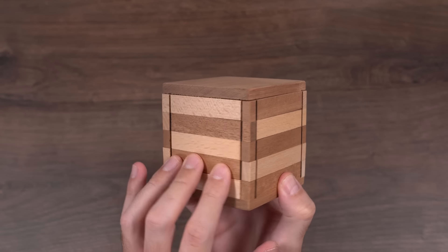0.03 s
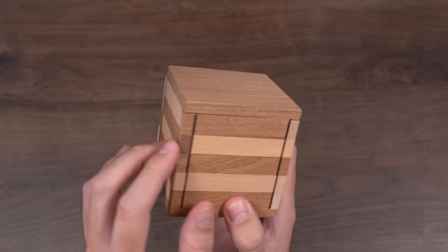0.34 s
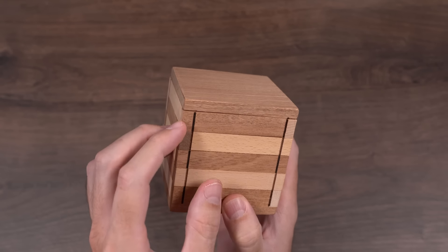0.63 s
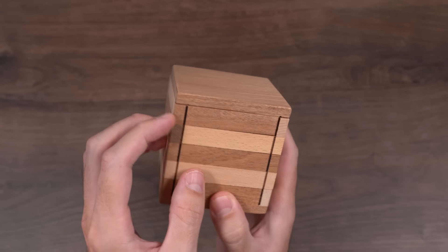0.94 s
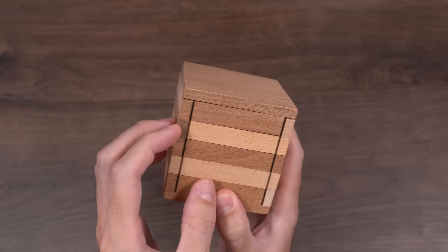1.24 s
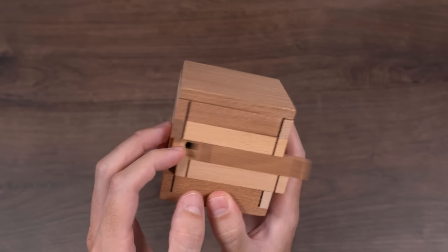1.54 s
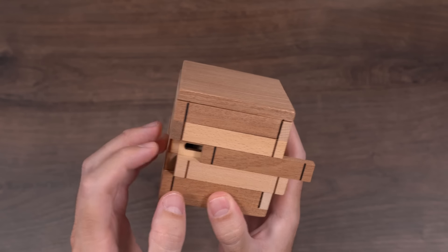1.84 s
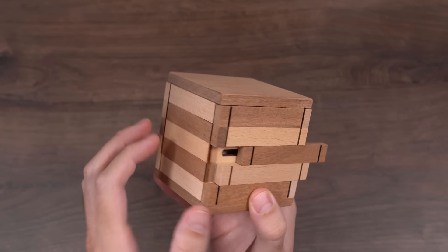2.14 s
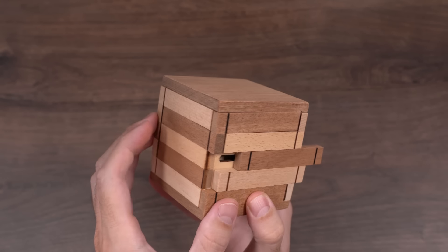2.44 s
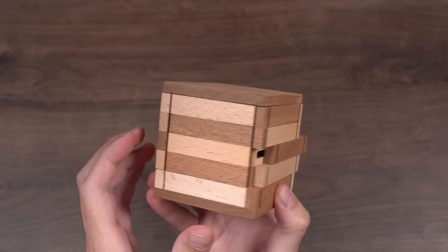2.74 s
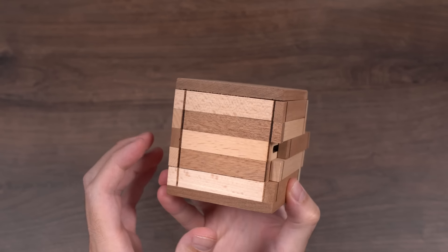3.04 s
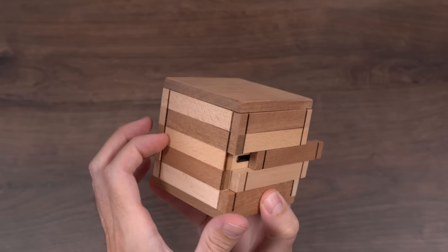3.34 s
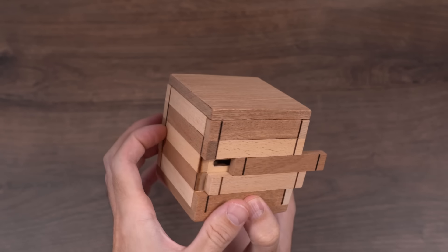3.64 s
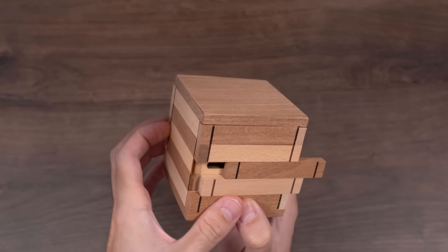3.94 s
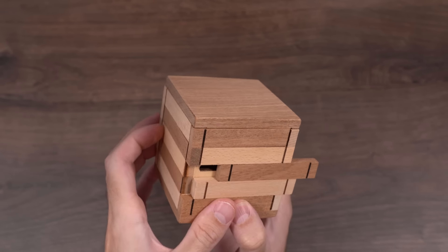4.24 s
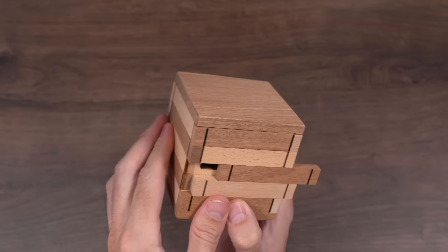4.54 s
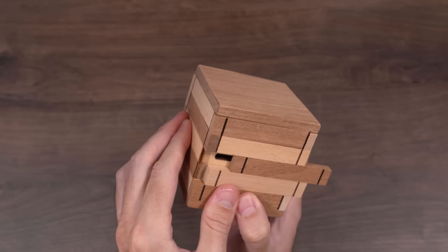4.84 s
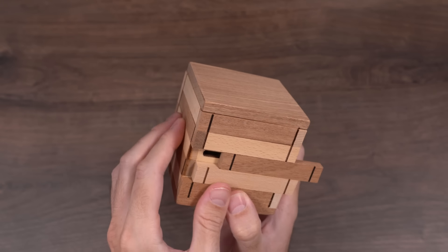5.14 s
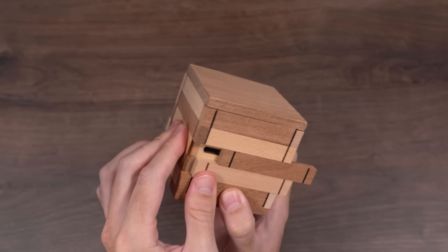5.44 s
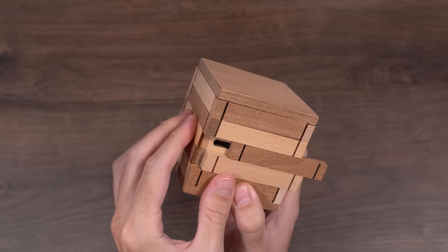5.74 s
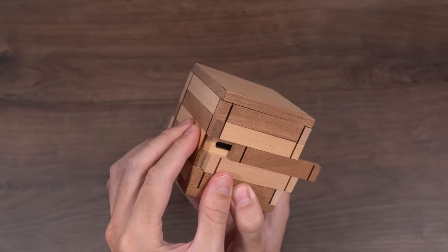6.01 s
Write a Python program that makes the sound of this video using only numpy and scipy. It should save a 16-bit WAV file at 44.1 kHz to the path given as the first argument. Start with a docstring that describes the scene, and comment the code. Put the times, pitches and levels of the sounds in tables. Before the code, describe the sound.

A wooden slat scrapes briefly and snaps against its stop, followed by a light tick and soft finger handling in a quiet room.

```python
"""Wooden puzzle box, close up.

Two hands turn the box over a low ventilation hum; fingertips hiss on the grain in runs of micro-slips.
One slat gives way, scrapes along its groove, cracks against the stop and rebounds, ringing the box.
Finger pads and palms give low thuds. Later a loose piece ticks, nails and joints snap faintly,
and a slat creeps with a faint, narrow hiss. The quiet room adds a short diffuse tail."""
import sys
import numpy as np
from scipy import signal
from scipy.fft import rfft, irfft
from scipy.io import wavfile

SR = 44100
rng = np.random.default_rng(int(sys.argv[2]) if len(sys.argv) > 2 else 0)


def dump(signal):
    """Clip the signal to [-1, 1] and save it as 16-bit WAV at the path in sys.argv[1]."""
    limited = np.clip(np.atleast_2d(signal).T, -1, 1)
    pcm = np.round(limited * 32767).astype(np.int16)
    wavfile.write(sys.argv[1], SR, pcm)


N = 272185
BLOW_SAMPLES = SR // 8
BLOW_TIME_S = np.arange(BLOW_SAMPLES) / SR


def from_db(db):
    return 10 ** (np.asarray(db) / 20)


def unit_rms(x):
    return x / np.sqrt(np.mean(x ** 2) + 1e-20)


def unit_attack(x):
    """Scale to rms 1 over the first 5 ms."""
    return x / np.sqrt(np.mean(x[:SR // 200] ** 2) + 1e-20)


def at_hz(curve, hz):
    points_hz, values = np.transpose(curve)
    return np.interp(np.log(hz + 1e-9), np.log(points_hz), values)


def bell_db(hz, centre_hz, width_oct):
    return -10 / np.log(10) * (np.log2(hz / centre_hz) / width_oct) ** 2


def coloured(x, gain_db_at):
    hz = np.fft.rfftfreq(len(x), 1 / SR) + 1
    return irfft(rfft(x) * from_db(gain_db_at(hz)), len(x))


def lowpass(x, hz, order=2):
    return signal.sosfilt(signal.butter(order, min(hz, .45 * SR), fs=SR, output="sos"), x)


def highpass(x, hz, order=2):
    return signal.sosfilt(signal.butter(order, hz, "high", fs=SR, output="sos"), x)


def add(track, start_s, sound):
    at = max(round(start_s * SR), 0)
    track[at:at + len(sound)] += sound[:max(N - at, 0)]


def stray_touches(per_s, level_db, centre_hz, spread_db=7.5, spread_oct=.3):
    """Touches at random moments, as rows of start_s, level_db, centre_hz."""
    draws = rng.random((40, 3))
    starts_s = np.cumsum(-np.log(1 - draws[:, 0])) / per_s
    levels_db = level_db + spread_db * (2 * draws[:, 1] - 1)
    centres_hz = centre_hz * 2 ** (spread_oct * (2 * draws[:, 2] - 1))
    return [row for row in zip(starts_s, levels_db, centres_hz) if row[0] < N / SR]


# Room air: freq_hz, density_db
AIR_SPECTRUM = [(12, -29.5), (20, -2), (39, -3.5), (77, -15), (163, -2), (204, -8.5), (310, -6), (399, -15),
                (446, -10), (897, -18), (1220, -17.5), (1530, -20.5), (4540, -36.5), (14700, -43.5),
                (16000, -49.5)]
# Ventilation hum: centre_hz, half_width_hz, level_db
HUM_LINES = [(108.4, 13, -66.5), (160.8, 10.9, -61.5), (238.7, 25, -68.5)]


def air_and_hum(air_db=-60, rumble_db=-61.5, rumble_hz=30, rumble_width_oct=.6):
    """Room air, a deep rumble and ventilation hum, whose narrow noise bands waver."""
    def noise(gain_db_at):
        return unit_rms(coloured(rng.standard_normal(N), gain_db_at))

    out = from_db(air_db) * noise(lambda hz: at_hz(AIR_SPECTRUM, hz))
    out += from_db(rumble_db) * noise(lambda hz: bell_db(hz, rumble_hz, rumble_width_oct))
    for centre_hz, half_width_hz, level_db in HUM_LINES:
        line = noise(lambda hz: -20 * np.log10(1 + ((hz - centre_hz) / half_width_hz) ** 2))
        out += from_db(level_db) * line
    return out


def rub_pressure(t, length_s, landing_share=.14, ease_db=2, lift_s=0.017):
    """Force rises on contact, eases along the rub and ends on release."""
    landing = t / (landing_share * length_s)
    lifting = (length_s - t) / lift_s
    contact = np.clip(np.minimum(landing, lifting), 0, 1)
    return contact * from_db(-ease_db * t / length_s)


# Skin sliding on wood: freq_hz, density_db
SKIN_SPECTRUM = [(700, -8), (1300, 2), (2000, -5), (2500, 1.5), (2900, -4), (3400, 1), (4000, -5),
                 (4600, -2), (5400, -7.5), (7500, -2), (9200, -3), (10300, -14), (12500, -8.5),
                 (16000, -11)]
# Fingertip rubs and one faint, narrow hiss of a slat creeping in its groove (at 4.78 s):
# start_s, length_s, level_db, centre_hz, width_oct
RUBS_AND_CREEP = [(0.0, 0.097, -71.5, 6000, 0.75), (0.136, 0.18, -64.5, 8000, 1.2),
                  (0.308, 0.15, -72.5, 3000, 0.81), (.39, 0.043, -68, 3000, 2),
                  (0.423, 0.29, -69.5, 4080, 1.35), (1.003, .028, -68, 4500, 1.1),
                  (1.385, 0.022, -64, 3560, 0.88), (1.426, 0.041, -59.5, 9000, 2.3),
                  (1.882, 0.074, -68.5, 7260, 1.2), (2.156, .045, -74, 7000, 1.2),
                  (2.564, 0.049, -72, 5000, 2.5), (3.232, 0.057, -69, 6440, 0.27),
                  (3.257, 0.056, -63.5, 7000, 2.2), (3.386, 0.063, -64.5, 11000, 2),
                  (3.553, 0.036, -64, 5000, 3.4), (3.806, 0.021, -68, 4000, 1.8),
                  (4.445, 0.057, -66.5, 3000, 1.5), (4.575, 0.054, -63, 3050, 0.84),
                  (4.67, 0.036, -51, 5200, 1.7), (4.78, .22, -72.5, 3430, 0.37),
                  (5.018, 0.027, -67.5, 6620, 2.4), (5.425, 0.076, -54, 5910, 2.2),
                  (5.898, 0.073, -61, 5240, 2.4), (6.121, 0.07, -67.5, 1450, 2)]


def rubs_and_creep(grain_db=2.0, uneven_db=1.5, ripple_db=1.5, brush_s=.04, brush_width_oct=2.1):
    """Skin ridges, and once a slat, catch on the grain; grip shifts add light random brushes."""
    out = np.zeros(N)
    grip = unit_rms(lowpass(rng.standard_normal(N), hz=60))
    catches = np.repeat(rng.standard_normal(N), 16)[:N]
    slips = rng.standard_normal(N) * from_db(grain_db * catches + uneven_db * grip)
    brushes = [(start_s, brush_s, level_db, hz, brush_width_oct)
               for start_s, level_db, hz in stray_touches(per_s=1.0, level_db=-80, centre_hz=5500)]
    rubs = RUBS_AND_CREEP + brushes
    # Each spot on the box favours other resonances.
    modes_hz = np.geomspace(1500, 16000, 40)
    spots_db = ripple_db * rng.standard_normal((64, len(modes_hz)))
    for (start_s, length_s, level_db, centre_hz, width_oct), spot_db in zip(rubs, spots_db):
        samples = np.arange(round(length_s * SR))
        grains = np.take(slips, round(start_s * SR) + samples, mode="wrap")
        hiss = coloured(grains, lambda hz: at_hz(SKIN_SPECTRUM, hz)
                        + bell_db(hz, centre_hz, width_oct)
                        + np.interp(hz, modes_hz, spot_db))
        add(out, start_s, from_db(level_db) * rub_pressure(samples / SR, length_s) * unit_rms(hiss))
    return out


# Dense short-lived slat modes, in scrape and crack: freq_hz, density_db
SLAT_SPECTRUM = [(150, -22), (400, -7), (850, -6), (1250, 2), (1600, -3), (2200, -3), (3200, -6),
                 (4500, -5), (6000, -11), (9000, -15), (11000, -19.5), (16000, -25.5)]


def slat_slide(start_s=1.567, end_s=1.606, start_db=-55, end_db=-39, slips_per_s=12000, tilt_db_oct=-4):
    """The freed slat scrapes along its groove, louder as it gathers speed."""
    out = np.zeros(N)
    slips = rng.standard_normal(BLOW_SAMPLES) * (rng.random(BLOW_SAMPLES) < slips_per_s / SR)
    scrape = coloured(slips, lambda hz: at_hz(SLAT_SPECTRUM, hz) + tilt_db_oct * np.log2(hz + 300))
    swell = from_db(np.linspace(start_db, end_db, round((end_s - start_s) * SR)))
    add(out, start_s, unit_rms(scrape)[:len(swell)] * swell)
    return out


def ringing(modes):
    """Struck modes, neighbours in opposite sign; the wider a resonance, the sooner it dies."""
    out = np.zeros(BLOW_SAMPLES)
    for k, (pitch_hz, width_hz, gain_db) in enumerate(modes):
        envelope = from_db(gain_db) * width_hz * np.exp(-np.pi * width_hz * BLOW_TIME_S)
        out += (-1) ** k * envelope * np.sin(2 * np.pi * pitch_hz * BLOW_TIME_S)
    return out


def blow_decay(t60_s):
    return from_db(-60 * BLOW_TIME_S / t60_s)


def contact_pulse(pitch_hz=2000, width_hz=1500, edge_hz=7000):
    """First push of air from the struck face, about one cycle; the wood gives, rounding the edge."""
    push = np.exp(-np.pi * width_hz * BLOW_TIME_S) * np.cos(2 * np.pi * pitch_hz * BLOW_TIME_S)
    return unit_attack(lowpass(highpass(push, pitch_hz / 2), edge_hz, order=1))


# Box resonances: pitch_hz, width_hz, gain_db
BOX_MODES = [(380, 110, -14.5), (600, 140, -16.5), (818, 220, -16), (1210, 160, 3), (1354, 160, 1),
             (1700, 200, -5), (1946, 200, -2), (2116, 210, -0.5), (2399, 170, -1.5), (2980, 110, -11),
             (3320, 200, -10), (3780, 105, -4), (4324, 210, -5), (4594, 120, -6), (5000, 300, -13.5),
             (5500, 420, -13.5), (6224, 270, -14.5), (7474, 400, -24), (8120, 230, -22), (9050, 400, -19),
             (12300, 160, -17)]
# Slat impacts: start_s, level_db, contact_lowpass_hz, pitch_ratio
SLAT_KNOCKS = [(1.576, -39, 2440, 0.95), (1.5988, -41, 8830, 1.2), (1.6055, -15.0, 11500, 1.0),
               (1.6299, -19, 4398, .99), (1.6317, -26, 10980, .96), (4.8747, -56.5, 4470, 0.976),
               (6.0928, -54, 1410, 0.95), (6.1053, -45, 1250, 1.02)]


def slat_knocks(polarity, pulse_db=-3.5, crack_db=-6, crack_t60_s=0.035, radiate_above_hz=380):
    """Each impact is a sharp pulse, box ring and slat crack; the small body radiates little bass."""
    out = np.zeros(N)
    pulse = polarity * from_db(pulse_db) * contact_pulse()
    for start_s, level_db, contact_hz, pitch_ratio in SLAT_KNOCKS:
        modes = [(hz * pitch_ratio, width_hz, gain_db) for hz, width_hz, gain_db in BOX_MODES]
        body = unit_attack(highpass(ringing(modes), radiate_above_hz))
        noise = coloured(rng.standard_normal(BLOW_SAMPLES), lambda hz: at_hz(SLAT_SPECTRUM, hz))
        crack = from_db(crack_db) * unit_attack(noise * blow_decay(crack_t60_s))
        blow = lowpass(pulse + body + crack, contact_hz, order=3)   # soft contact dulls it
        add(out, start_s, from_db(level_db) * unit_attack(blow))
    return out


# Low thuds of the whole box, from finger pads and palms and, at 1.609 s and 1.6314 s, from the rebounding slat:
# start_s, peak_db, pitch_hz
BOX_THUDS = [(1.609, -35, 454), (1.6314, -33.5, 296.4), (3.501, -41.5, 237), (3.574, -49, 421),
             (4.695, -46.5, 278), (4.995, -48.5, 456), (5.531, -44.5, 250), (6.106, -41, 380),
             (6.1207, -35.5, 131)]


def box_thuds(width_hz=45):
    """Soft flesh, or the slat's rebound, moves the whole box in a low thud; every thud dies alike."""
    out = np.zeros(N)
    for start_s, peak_db, pitch_hz in BOX_THUDS:
        add(out, start_s, ringing([(pitch_hz, width_hz, peak_db)]) / width_hz)
    return out


# Loose piece resonances: pitch_hz, width_hz, gain_db
PIECE_MODES = [(2150, 370, 3), (2490, 170, 17.5), (2700, 180, -23), (3120, 380, 7.5), (3750, 175, 11),
               (4000, 310, 6.5), (4600, 400, -28), (7500, 1100, -32), (12600, 1500, -26)]
# Its one impact: start_s, level_db
PIECE_TICK = (3.1094, -36.5)


def loose_piece(crack_db=-23, crack_t60_s=0.025, radiate_above_hz=2100):
    """A piece too small to radiate lows drops against its neighbour with one bright tick."""
    out = np.zeros(N)
    start_s, level_db = PIECE_TICK
    crack = unit_attack(rng.standard_normal(BLOW_SAMPLES) * blow_decay(crack_t60_s))
    blow = unit_attack(ringing(PIECE_MODES)) + from_db(crack_db) * crack
    add(out, start_s, from_db(level_db) * unit_attack(highpass(blow, radiate_above_hz, order=4)))
    return out


# Clearest nail and joint ticks: start_s, level_db, centre_hz, width_oct
NAIL_AND_JOINT_TICKS = [(3.209, -63, 5500, 0.9), (3.545, -65.5, 8030, 0.59), (4.197, -67, 8500, 0.76),
                        (4.575, -63.5, 3680, 0.56), (5.725, -61.5, 4880, 0.16)]


def nail_and_joint_ticks(t60_s=0.012, stray_width_oct=.8):
    """Nails and joints give tiny dry snaps, with fainter ones at random."""
    out = np.zeros(N)
    strays = [(*touch, stray_width_oct)
              for touch in stray_touches(per_s=0.98, level_db=-75.5, centre_hz=5500)]
    noise = rng.standard_normal(N + BLOW_SAMPLES)
    for start_s, level_db, centre_hz, width_oct in NAIL_AND_JOINT_TICKS + strays:
        burst = noise[round(start_s * SR):][:BLOW_SAMPLES]
        snap = coloured(burst, lambda hz: bell_db(hz, centre_hz, width_oct)) * blow_decay(t60_s)
        add(out, start_s, from_db(level_db) * unit_attack(snap))
    return out


# Room decay: freq_hz, t60_s
ROOM_DECAY = [(150, 0.21), (500, .38), (1400, .42), (3800, 0.5), (9000, 0.38), (15000, .3)]
# Colour of the reflections: freq_hz, gain_db
ROOM_SPECTRUM = [(150, -6.5), (750, 4), (1100, -3.5), (1450, 0.5), (2200, -4.5), (2900, 1.5), (3850, 3),
                 (4500, 0), (6000, 1), (9000, 2), (15000, 2.5)]


def room(x, wet_db=-8.0, build_s=0.0044):
    """Diffuse reflections build up in a few milliseconds and die away in half-octave bands."""
    t = np.arange(SR * 3 // 4) / SR
    hz = np.fft.rfftfreq(len(t), 1 / SR) + 1
    reflections = rfft(rng.standard_normal(len(t))) * from_db(at_hz(ROOM_SPECTRUM, hz))
    bands = np.round(2 * np.log2(hz))
    tail = np.zeros(len(t))
    for band in np.unique(bands[hz > 60]):
        t60_s = at_hz(ROOM_DECAY, 2 ** (band / 2))
        tail += irfft(reflections * (bands == band), len(t)) * from_db(-60 * t / t60_s)
    tail *= 1 - np.exp(-(t / build_s) ** 2)
    tail /= np.sqrt(np.sum(tail ** 2))
    return from_db(wet_db) * signal.fftconvolve(x, tail)[:N]


def scene(tick_send_db=-4.5, rub_send_db=-1):
    """The box is heard directly and through the room; its far side only from the walls."""
    near_knocks = slat_knocks(polarity=-1)   # the jolted box draws air in on this side
    far_knocks = slat_knocks(polarity=1)   # and pushes it out on the other
    wood = slat_slide() + box_thuds()
    ticks = loose_piece() + nail_and_joint_ticks()
    rubs = rubs_and_creep()
    send = wood + from_db(tick_send_db) * ticks + from_db(rub_send_db) * rubs
    reverb = (room(near_knocks + send) + room(far_knocks + send)) / np.sqrt(2)
    return (near_knocks + wood + ticks + rubs + reverb + air_and_hum())[None]


def record(dry, cutoff_hz=15800):
    """Steep treble cut."""
    return signal.sosfilt(signal.ellip(10, .1, 70, cutoff_hz, fs=SR, output="sos"), dry)


dry = scene()
out = record(dry)
dump(out)
```